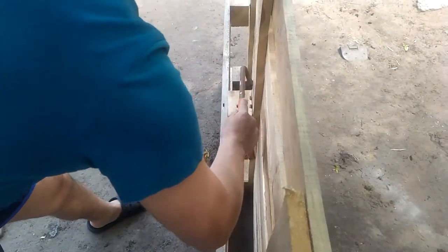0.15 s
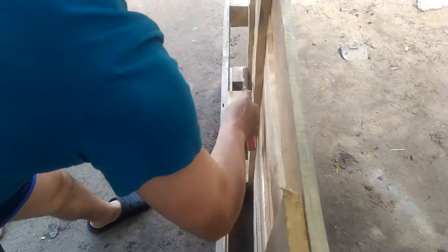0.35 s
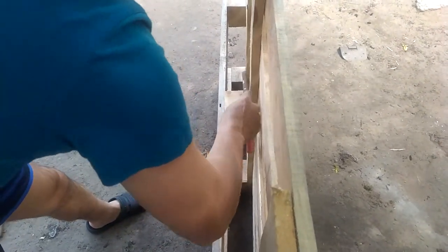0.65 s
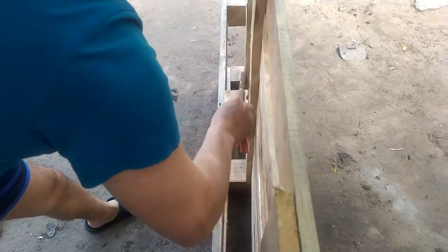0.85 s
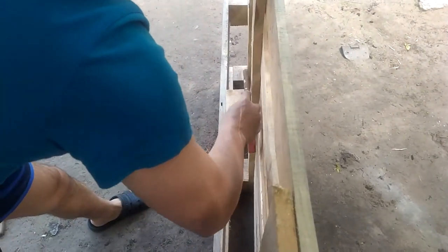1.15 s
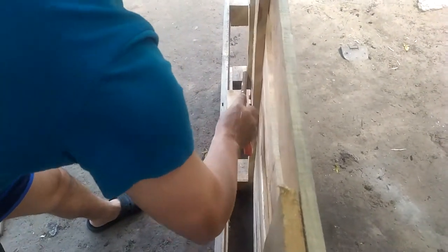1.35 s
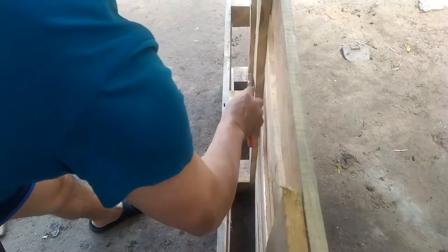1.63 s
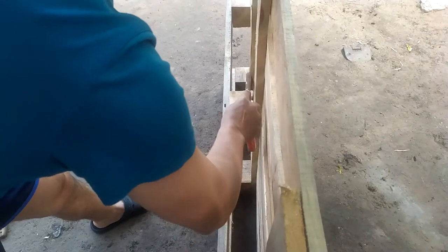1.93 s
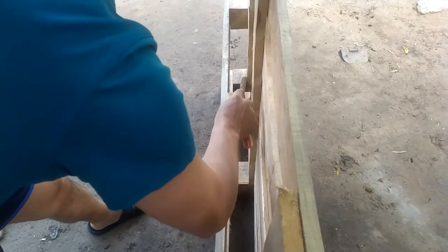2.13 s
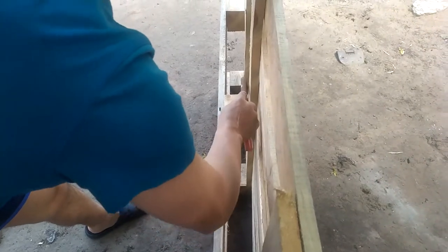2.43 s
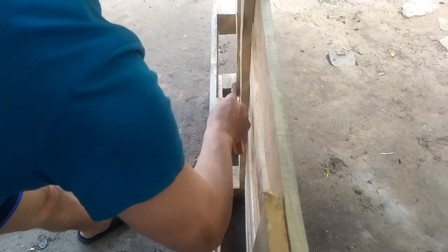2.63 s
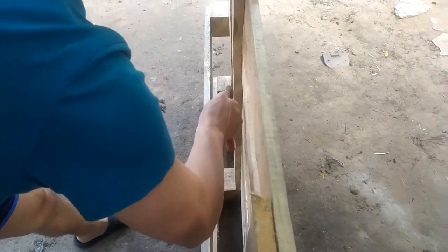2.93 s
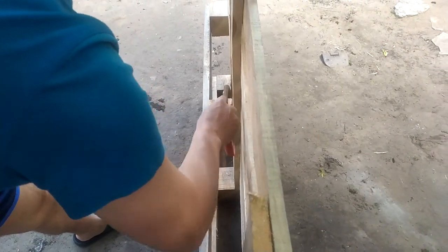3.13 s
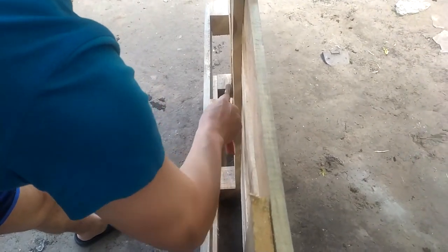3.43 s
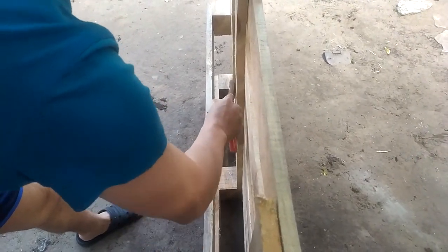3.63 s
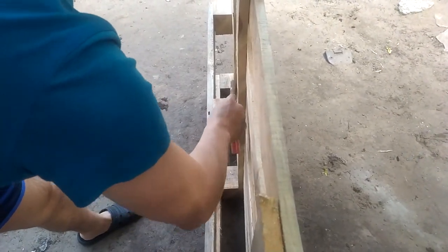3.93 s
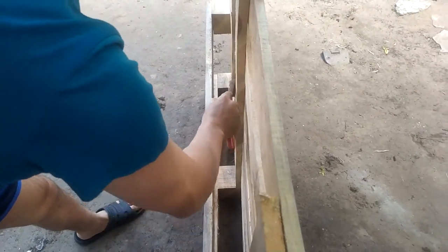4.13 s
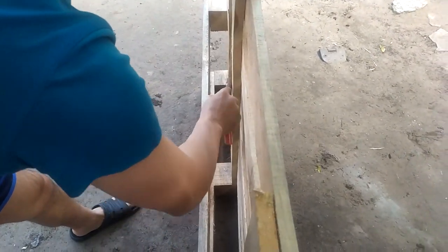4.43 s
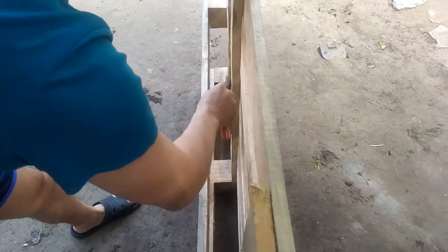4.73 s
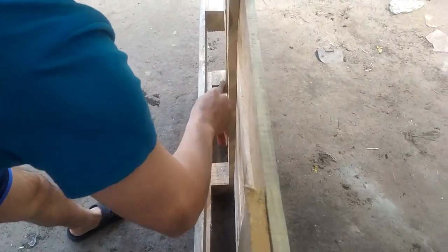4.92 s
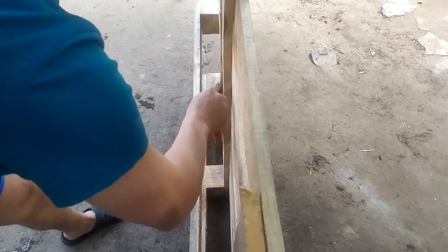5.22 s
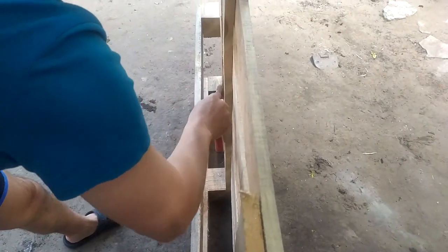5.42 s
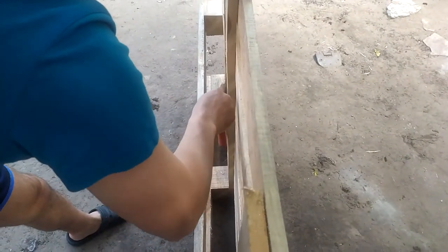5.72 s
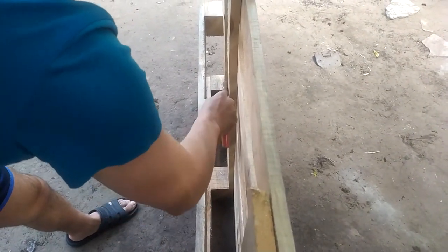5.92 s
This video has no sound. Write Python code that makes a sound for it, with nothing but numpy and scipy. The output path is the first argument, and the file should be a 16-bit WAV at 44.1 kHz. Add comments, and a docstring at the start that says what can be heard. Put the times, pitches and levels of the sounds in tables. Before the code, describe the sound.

A hacksaw rasps quickly to and fro through nails between pallet boards, thin metallic screeches and hollow wooden thuds mounting while a small bird chirps.

```python
"""Yard: a hacksaw is worked to and fro through the nails between two boards of a wooden pallet.
Teeth catch as uneven noise bursts that rasp and ring the boards; the pallet thuds and booms with the strokes.
Slips of the binding blade ring a steel resonance near 10 kHz; jams shriek, the blade knocks, the pallet bumps.
A small bird repeats one chirp over a quiet hush; the left microphone is muffled."""
import sys
import numpy as np
from scipy import signal
from scipy.fft import rfft, irfft, next_fast_len
from scipy.io import wavfile
from scipy.ndimage import uniform_filter1d

SR = 44100
rng = np.random.default_rng(int(sys.argv[2]) if len(sys.argv) > 2 else 0)


def dump_mix(stems):
    """Bounce the given channels to the path in sys.argv[1] as a 16-bit WAV at rate SR."""
    frames = np.atleast_2d(stems).T  # one column per channel
    limited = np.clip(frames, -1, 1)  # hard clip at full scale
    pcm = np.round(limited * 32767).astype(np.int16)
    wavfile.write(sys.argv[1], SR, pcm)


N = 267687
TIME_S = np.arange(N) / SR

# outdoor hush spectrum: [freq_hz, relative_db]
HUSH_CURVE = [(22, -23), (40, -2.5), (62, 1.5), (110, -1), (200, -6.5), (430, -12), (750, -17),
              (1400, -21.5), (2200, -17), (3000, -16), (8000, -20), (16000, -30.5)]
# one chirp, pitch before detuning: [time_s, pitch_hz, relative_db]
CHIRP = [(0, 4300, -27), (0.035, 4420, -4), (0.059, 5000, 4), (0.066, 3690, 1), (0.084, 3380, -5),
         (.102, 3370, -1), (.11, 3800, 4.5), (.118, 3140, -7.5), (0.127, 2590, -4)]
# chirp times: [start_s, level_db]
CHIRPS = [(.001, -36.5), (.669, -33), (1.342, -33), (2.209, -34.5), (2.921, -35), (4.375, -36.5),
          (5.044, -34.5), (5.723, -35.5)]
# dull bumps of the rocking pallet: [time_s, relative_db]
BUMPS = [(0.332, -44), (0.574, -38), (1.718, -34.5), (2.935, -33), (3.212, -28), (4.139, -37),
         (5.031, -26.5), (5.186, -26), (5.291, -25.5)]
# knocks of the blade in the slot: [time_s, relative_db]
KNOCKS = [(.573, -35), (2.015, -39), (2.589, -29), (2.879, -31.5), (5.268, -31.5), (5.559, -40),
          (5.73, -24.5)]
# ringing modes of the boards: [freq_hz, width_hz, relative_db]
BOARD_MODES = [(157.5, 5, -8), (261.4, 15, -14), (389, 8.3, 1), (489, 5, 4), (572, 20, 5.5),
               (636.5, 8.7, -6), (762, 45, -13.5), (876, 27, 2), (945, 83, -13), (1314, 25, -11),
               (1613, 160, -5), (1874, 120, -13), (3240, 280, -11.5)]
# low ringing modes of the whole frame: [freq_hz, width_hz, relative_db]
FRAME_MODES = [(68, 17, 12.5), (131, 3.4, 28), (167, 11.4, 19)]
# wood spectrum: [freq_hz, relative_db]
WOOD_CURVE = [(120, -23), (320, -25), (440, 4), (620, 1.5), (850, 0), (1200, -1.5), (1700, -5),
              (2500, -8.5), (4000, -26), (7000, -12.5), (16000, -76)]
# gritty treble spectrum: [freq_hz, relative_db]
GRIT_CURVE = [(1200, -19), (2800, -1), (4400, 0.5), (4950, 0), (5600, 5), (6900, -13.5), (8500, -5),
              (10300, -4.5), (11800, -5.5), (13200, -21), (15500, -26)]
# thud spectrum: [freq_hz, relative_db]
THUD_CURVE = [(25, -27), (60, -6), (140, -6.5), (260, 1), (400, -3.5), (900, -20.5)]
BACK, CUT = 0, 1
# saw strokes, pitch at full bite: [start_s, length_s, direction, rasp_db, screech_db, pitch_hz]
STROKES = [(.556, .103, BACK, -46.5, -70, 10400), (.66, .105, CUT, -37.5, -35, 10330),
           (1.055, .098, CUT, -37, -49.5, 10600), (1.236, .072, BACK, -46.5, -35, 10820),
           (1.32, .117, CUT, -46.5, -56.5, 10340), (1.466, .104, BACK, -42.5, -31.5, 10270),
           (1.597, .102, CUT, -36.5, -32.5, 10620), (1.768, .08, BACK, -41, -27, 9680),
           (1.878, .112, CUT, -36, -35, 10620), (2.014, .098, BACK, -40.5, -26, 10000),
           (2.148, .108, CUT, -36.5, -32.5, 10060), (2.308, .074, BACK, -37, -24, 9680),
           (2.432, .088, CUT, -29, -27.5, 10280), (2.577, .11, BACK, -40.5, -25.5, 9430),
           (2.704, .116, CUT, -38, -33, 9290), (2.864, .1, BACK, -41.5, -25.5, 9697),
           (2.989, .108, CUT, -32.5, -33.5, 9980), (3.14, .105, BACK, -39, -31.5, 10500),
           (3.274, .11, CUT, -31.5, -30.5, 10400), (3.429, .106, BACK, -38, -22, 9720),
           (3.551, .106, CUT, -32, -39, 10460), (3.719, .09, BACK, -40, -23, 10050),
           (3.828, .11, CUT, -36.5, -30, 10370), (3.992, .116, BACK, -41, -24, 9500),
           (4.105, .12, CUT, -32.5, -28.5, 10200), (4.26, .122, BACK, -37.5, -21.5, 9860),
           (4.399, .125, CUT, -35.5, -27.5, 10100), (4.551, .12, BACK, -39, -21.5, 9690),
           (4.678, .12, CUT, -34.5, -28.5, 10050), (4.847, .112, BACK, -37.5, -21.5, 9660),
           (4.962, .125, CUT, -34, -53, 9550), (5.116, .104, BACK, -38, -32.5, 10520),
           (5.256, .116, CUT, -30, -52, 9270), (5.412, .104, BACK, -41, -49, 11740),
           (5.54, .114, CUT, -33.5, -49, 9950), (5.713, .098, BACK, -35, -43.5, 10200),
           (5.833, .129, CUT, -35.5, -52, 10470), (5.988, .081, BACK, -38, -60, 10300)]
# rows back, cut: [speeding_up_share, thud_db, grit_db, first_grab_db, bind_after_s]
DIRECTIONS = [(.44, -23.5, -2.5, -2.5, .014), (.55, -18, -5, -4, .017)]
# harder strokes sound woodier and lower: [rasp_db, grit_db, wood_ring_hz, wood_ring_db]
# (last row serves strokes above its rasp_db, first row all others)
PRESSURE = [(-29, -0.5, 1050, 2.5), (-32.5, 1, 793, 3), (-32, 2.5, 750, 11)]
# how freely the pallet rocks under the saw: [time_s, thud_db]
ROCKING = [(.6, 4), (1.1, -8), (2.1, -1), (2.5, -14), (2.75, 13), (3.2, 8), (3.55, -2), (4.1, 6.5),
           (5.1, 8.5), (5.4, 3), (5.9, 4)]
# gritty treble as the sawing goes on: [time_s, grit_db]
GRITTINESS = [(.6, -2), (1.3, 1), (2, -1), (2.45, 2), (2.7, -6), (3.3, 1), (4, 3), (5.05, -5), (5.45, 0),
              (5.9, -3.5)]
# deep bite low and loud at once, light bite swells late and sinks far: [pitch_hz, swell_share, sag_hz]
BITE = [(9490, 0.32, 300), (10270, .45, 450), (10940, .72, 600)]
# short shrieks of the jamming blade: [start_s, length_s, level_db, pitch_hz]
JAMS = [(.68, .012, -31, 10100), (2.031, .02, -28.5, 9300), (2.59, .016, -24.5, 9500),
        (2.878, 0.06, -24, 8030), (3.445, 0.023, -24.5, 9700), (4.046, .03, -29, 8030),
        (4.337, 0.039, -29, 8500), (4.865, .016, -20.5, 9900), (5.264, 0.029, -28.5, 9700),
        (5.557, 0.029, -32.5, 9300)]
# left microphone response: [freq_hz, gain_db]
LEFT_MUFFLE = [(100, -1.5), (2300, 0.5), (3100, -3.5), (4000, -9.5), (5000, -13), (7000, -13.5),
               (9300, -4.5), (11000, -14), (12000, -18), (16000, -21)]

FREE_BEFORE_S = .017  # blade comes free this long before the stroke ends
OVERRUN_S = .006  # teeth still graze the nail while the arm turns round
GRAB_S = 0.00027  # time constant of the steel starting to ring
LEFT_DELAY_S, LOW_CUT_HZ, HIGH_CUT_HZ = .00015, 45, 15900


def from_db(db):
    """Decibels to gain."""
    return 10 ** (np.asarray(db) / 20)


def rms_one(x):
    """Scale to unit rms."""
    return x / np.sqrt(np.mean(x ** 2) + 1e-20)


def drift(rate_hz):
    """Random wander of unit rms: straight lines between random knots."""
    knots = rng.standard_normal(int(N / SR * rate_hz) + 2)
    return rms_one(np.interp(TIME_S * rate_hz, np.arange(len(knots)), knots))


def colour(x, curve):
    """Filter by a (Hz, dB) curve interpolated over log frequency."""
    hz, db = np.transpose(curve)
    size = next_fast_len(N + SR // 10)
    bins_hz = np.maximum(np.fft.rfftfreq(size, 1 / SR), 1)
    gains = from_db(np.interp(np.log(bins_hz), np.log(hz), db))
    return irfft(rfft(x, size) * gains, size)[..., :N]


def voiced_by(x, curve):
    """Colour a white force without changing its power."""
    hz, db = np.transpose(curve)
    gains = from_db(np.interp(np.log(np.arange(1, SR // 2)), np.log(hz), db))
    return colour(x, curve) / np.sqrt(np.mean(gains ** 2))


def low_pass(x, order, cutoff_hz):
    """Butterworth low-pass."""
    return signal.sosfilt(signal.butter(order, cutoff_hz, fs=SR, output="sos"), x)


def high_pass(x, order, cutoff_hz):
    """Butterworth high-pass."""
    return signal.sosfilt(signal.butter(order, cutoff_hz, "high", fs=SR, output="sos"), x)


def resonance(x, hz, width_hz):
    """Two-pole resonance with gain 1 on top."""
    r = np.exp(-np.pi * width_hz / SR)
    feedforward = np.array([1, 0, -1]) * (1 - r * r) / 2
    feedback = [1, -2 * r * np.cos(2 * np.pi * hz / SR), r * r]
    return signal.lfilter(feedforward, feedback, x + 1e-18)


def catches(per_s, uneven, spread_db):
    """Clicks of unit mean power: teeth catch at an uneven pace and with uneven force."""
    passed = np.cumsum(per_s * np.exp(uneven * drift(400))) / SR
    force = from_db(spread_db * np.clip(rng.standard_normal(N), -2, 2))
    clicks = np.diff(np.floor(passed), prepend=0) * force
    return rms_one(clicks / np.sqrt(per_s))


def crumble(clicks, decay_s):
    """Each click breaks into a short burst of noise of the same energy."""
    r = np.exp(-2 / (decay_s * SR))
    power = signal.lfilter([1 - r], [1, -r], clicks ** 2 + 1e-18)
    return np.sqrt(power) * rng.standard_normal(N)


def swing(start_s, length_s, rise_share):
    """Samples of one stroke and the blade speed (0-1) along them."""
    turns_s = start_s + length_s * np.array([0, np.clip(rise_share, .05, .95), 1])
    at = np.arange(*np.searchsorted(TIME_S, turns_s[::2]))
    half_turns = np.interp(TIME_S[at], turns_s, [0, .5, 1])
    return at, np.abs(np.sin(np.pi * half_turns))


def grab(at):
    """Quick start of a screech over the given samples."""
    return 1 - np.exp(-np.arange(len(at)) / (GRAB_S * SR))


def yard(x, near_db, near_t60_s, far_db, far_t60_s, apart_hz, shadow_db=-4.5):
    """Direct sound, scatter from boards and ground, faint tail from walls; bass is alike at both ears."""
    t = np.arange(SR * 3 // 4) / SR
    near = from_db(near_db - 60 * t / near_t60_s) / np.sqrt(near_t60_s)
    far = from_db(far_db - 60 * t / far_t60_s) / np.sqrt(far_t60_s)
    fade = (near + far) * np.sqrt(2 * np.log(1000) / SR) * (t > .001)
    scatter = rng.standard_normal((3, len(t))) * fade
    apart = high_pass(scatter[:2], 2, apart_hz)
    alike = low_pass(scatter[2], 2, apart_hz)
    echoes = signal.fftconvolve(x[None], apart + from_db(-3) * alike, axes=1)[:, :N]
    shadowed = colour(x, [(400, 0), (1200, shadow_db)])  # left ear gets less direct treble
    return np.array([shadowed, x]) + echoes


def hush():
    """Quiet outdoor noise, partly common to both ears, slowly wavering."""
    noise = rng.standard_normal(N) + 0.68 * rng.standard_normal((2, N))
    return from_db(-57.5) * voiced_by(noise, HUSH_CURVE) * from_db(2.0 * drift(11))


def bird(upper_ratio=1.23, upper_db=-11, second_db=-18, third_db=-24, burr=0.035):
    """Looping, burry whistle with faint overtones; the second side of the syrinx sings above it."""
    s, hz, db = np.transpose(CHIRP)
    t = np.arange(int(s[-1] * SR)) / SR
    out = np.zeros(N)

    def phase(ratio):
        burred = 1 + burr * drift(900)[:len(t)]
        return 2 * np.pi * np.cumsum(np.interp(t, s, hz) * ratio * burred) / SR

    detunes = rng.normal(1, 0.01178, len(CHIRPS))
    for (start_s, level_db), detune in zip(CHIRPS, detunes):
        lower = phase(detune)
        upper = phase(detune * upper_ratio)
        whistle = np.sin(lower) + from_db(second_db) * np.sin(2 * lower)
        whistle += from_db(third_db) * np.sin(3 * lower) + from_db(upper_db) * np.sin(upper)
        at = max(round(start_s * SR), 0)
        out[at:at + len(t)] += from_db(level_db + np.interp(t, s, db)) * whistle
    return out


def clicks_at(events, gain_db):
    """Single-sample clicks from (s, dB) rows."""
    clicks = np.zeros(N)
    for time_s, db in events:
        clicks[round(time_s * SR)] = from_db(db + gain_db)
    return clicks


def bumps(low_hz=225, low_width_hz=120, high_hz=275, high_width_hz=200, rattle_db=-8):
    """Soft contact stirs the low, heavily damped bending of the boards, and they rattle faintly."""
    clicks = clicks_at(BUMPS, gain_db=40.5)
    force = clicks + from_db(rattle_db) * crumble(clicks, decay_s=0.059)
    return resonance(resonance(force, low_hz, low_width_hz), high_hz, high_width_hz)


def boards(force, shifting_db=1.5):
    """Pallet modes, driven together; their balance shifts as the blade leans."""
    return sum(from_db(db + shifting_db * drift(18)) * resonance(force, hz, width_hz)
               for hz, width_hz, db in BOARD_MODES)


def knocks(wood_db=-5.0, boards_db=0):
    """The blade hits the side of the slot as it turns round."""
    force = crumble(clicks_at(KNOCKS, gain_db=16), decay_s=0.0036)
    wood = from_db(wood_db) * voiced_by(force, WOOD_CURVE)
    return voiced_by(force, GRIT_CURVE) + wood + from_db(boards_db) * boards(force)


def steel_ring(pitch_hz, speed, ring_s, waver_hz, octave_db, tear_db, clump_db):
    """Each slip of the blade rings a steel resonance at the given pitch."""
    slips = catches(170 + 240 * speed, uneven=0.31, spread_db=-1.5)
    kicks = slips * np.exp(2j * np.pi * rng.random(N))
    rings = signal.lfilter([1], [1, -np.exp(-1 / (ring_s * SR))], kicks + 1e-18)
    rings = low_pass(rings, 2, 1300)  # a ring takes a few cycles to build up
    power = np.abs(rings) ** 2
    rings = rings / np.sqrt(1 + power / np.mean(power) / 2)  # friction caps the swing
    carrier = np.exp(2j * np.pi * np.cumsum(pitch_hz + waver_hz * drift(120)) / SR)
    ring = rings * carrier
    # tearing metal: a wider, rougher band 380 Hz above the ring
    tear = low_pass(crumble(slips, decay_s=0.0013) + 1j * crumble(slips, decay_s=0.0024), 3, 1250)
    tear = tear * carrier * np.exp(2j * np.pi * 380 * TIME_S)
    clumps = drift(130)  # slips come in clumps a few milliseconds long
    clumping = from_db(clump_db * (clumps - uniform_filter1d(clumps, size=SR // 25)))
    octave = from_db(octave_db) * rms_one((ring ** 2).real)
    return clumping * (rms_one(ring.real) + octave + from_db(tear_db) * rms_one(tear.real))


def jams(release_power=0.52):
    """A jam shrieks at full force and eases off as the grip fades."""
    level, grip = np.zeros((2, N))
    pitch_hz = np.full(N, np.median([row[-1] for row in JAMS]))
    for start_s, length_s, db, hz in JAMS:
        at = np.arange(*np.searchsorted(TIME_S, [start_s, start_s + length_s]))
        grip[at] = np.linspace(1, 0, len(at))
        pitch_hz[at] = hz
        level[at] = from_db(db) * grab(at) * grip[at] ** release_power
    return level * steel_ring(pitch_hz, grip, ring_s=0.0011, waver_hz=260, octave_db=-13, tear_db=-6,
                              clump_db=1.5)


def screech(speed_power=0.8, sink_on_hz=-60):
    """In every stroke the blade grabs, swells as its pitch sinks, and lets go."""
    level, speed = np.zeros((2, N))
    pitch_hz = np.full(N, np.median([row[-1] for row in STROKES]))
    bite_hz, swell_shares, sags_hz = np.transpose(BITE)
    for start_s, length_s, way, _, db, hz in STROKES:
        *_, grab_db, bind_s = DIRECTIONS[way]
        swell = np.interp(hz, bite_hz, swell_shares)
        sag_hz = np.interp(hz, bite_hz, sags_hz)
        at, pace = swing(start_s + bind_s, length_s - bind_s - FREE_BEFORE_S, swell)
        along = np.linspace(0, 1, len(at))
        first_grab = from_db(grab_db) * (along < swell)
        level[at] += from_db(db) * grab(at) * np.maximum(pace ** speed_power, first_grab)
        pitch_hz[at] = hz + np.interp(along, [0, .5, 1], [sag_hz, 0, sink_on_hz])
        speed[at] = pace
    ring = steel_ring(pitch_hz, speed, ring_s=0.002, waver_hz=280.5, octave_db=-21, tear_db=-5.0,
                      clump_db=3.5)
    return from_db(-.5) * level * ring


def rasp(speed_power=1.4, slow_per_s=80, fast_per_s=260, chatter_db=2.0, stressed_width_hz=150):
    """Teeth tear over the nail, faster and harder in mid-stroke, and shake the wood."""
    speed, push, thud, grit, stressed = np.zeros((5, N))
    swings = [swing(start_s - OVERRUN_S, length_s + 2 * OVERRUN_S, DIRECTIONS[way][0])
              for start_s, length_s, way, *_ in STROKES]
    for at, pace in swings:
        speed[at] = pace
    teeth = catches(slow_per_s + fast_per_s * speed, uneven=.35, spread_db=2.0)
    bite = rms_one(crumble(teeth, decay_s=0.0017) + from_db(-3) * rng.standard_normal(N))
    bite = bite * from_db(chatter_db * drift(140))  # the blade grabs and skips
    for (at, pace), (_, _, way, rasp_db, *_) in zip(swings, STROKES):
        _, thud_db, grit_db, *_ = DIRECTIONS[way]
        pressed = PRESSURE[-1] if rasp_db > PRESSURE[-1][0] else PRESSURE[0]
        _, pressed_grit_db, ring_hz, ring_db = pressed
        force = from_db(rasp_db) * pace ** speed_power * bite[at]
        push[at] += force
        thud[at] += force * from_db(thud_db)
        grit[at] += force * from_db(grit_db + pressed_grit_db)
        stressed[at] += from_db(ring_db) * resonance(force, ring_hz, stressed_width_hz)
    wood = from_db(-6) * voiced_by(push, WOOD_CURVE) + from_db(9.5) * boards(push) + stressed
    grit = grit * from_db(np.interp(TIME_S, *np.transpose(GRITTINESS)))
    thud = thud * from_db(np.interp(TIME_S, *np.transpose(ROCKING)))
    # the whole frame takes up the shaking and booms on after each stroke
    boom = sum(from_db(db) * resonance(thud, hz, width_hz) for hz, width_hz, db in FRAME_MODES)
    return wood + voiced_by(grit, GRIT_CURVE) + voiced_by(thud, THUD_CURVE) + boom


def scene():
    """Saw, steel, bird and hush in the yard."""
    saw = yard(rasp() + knocks() + bumps(), near_db=1.5, near_t60_s=0.052, far_db=-11.0, far_t60_s=0.8,
               apart_hz=429)
    steel = yard(screech() + jams(), near_db=0.5, near_t60_s=0.083, far_db=-7, far_t60_s=0.31,
                 apart_hz=1500)
    chirps = yard(bird(), near_db=5, near_t60_s=0.16, far_db=-9.5, far_t60_s=0.62, apart_hz=1200)
    return from_db(-.6) * saw + steel + from_db(-1.5) * chirps + hush()


def record(dry):
    """The left microphone hears later and duller; deep bass and top are cut on both."""
    left = np.interp(TIME_S - LEFT_DELAY_S, TIME_S, colour(dry[0], LEFT_MUFFLE))
    heard = high_pass(np.array([left, dry[1]]), 2, LOW_CUT_HZ)
    return signal.sosfilt(signal.ellip(10, .3, 80, HIGH_CUT_HZ, fs=SR, output="sos"), heard)


dry = scene()
out = record(dry)
dump_mix(out)
```